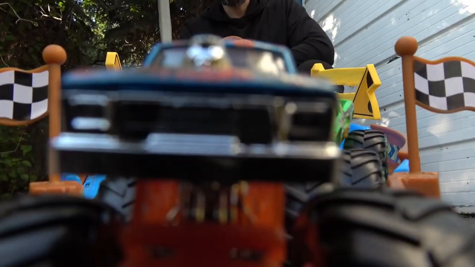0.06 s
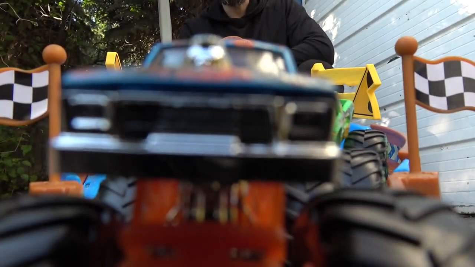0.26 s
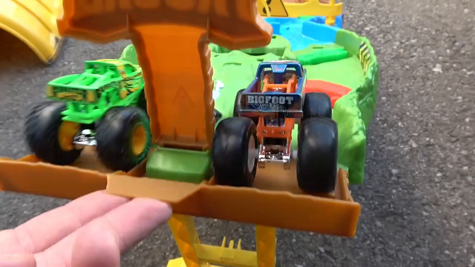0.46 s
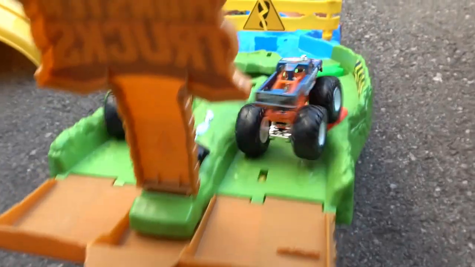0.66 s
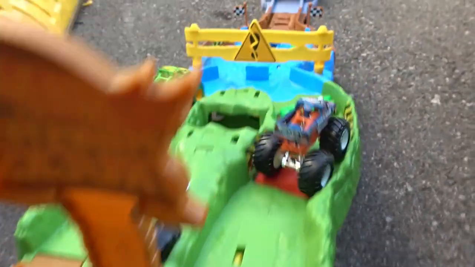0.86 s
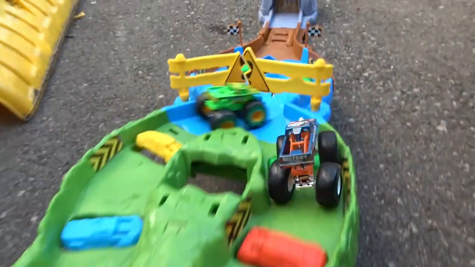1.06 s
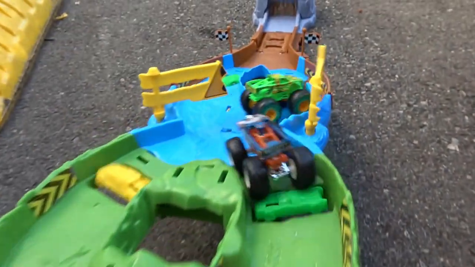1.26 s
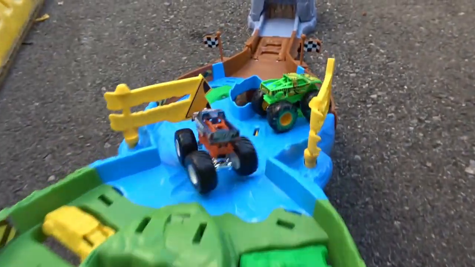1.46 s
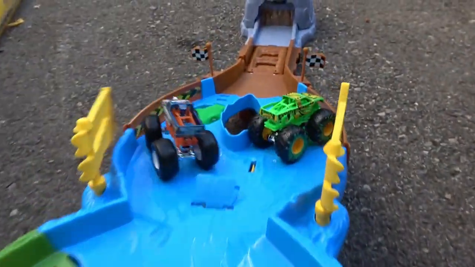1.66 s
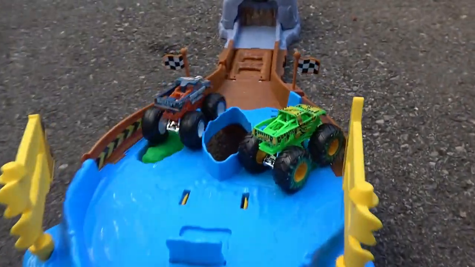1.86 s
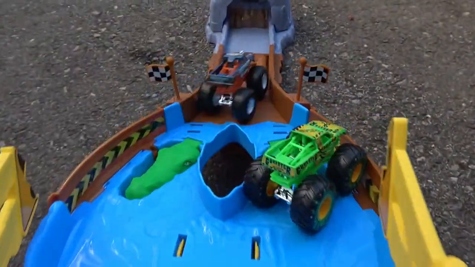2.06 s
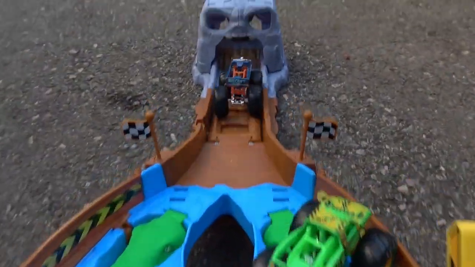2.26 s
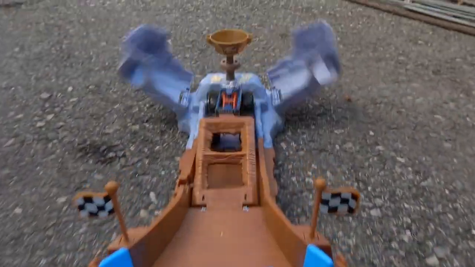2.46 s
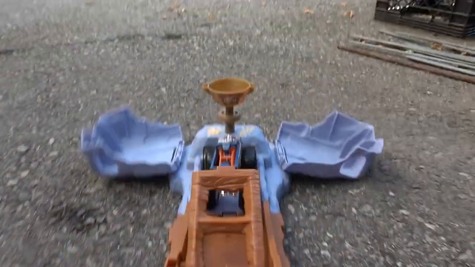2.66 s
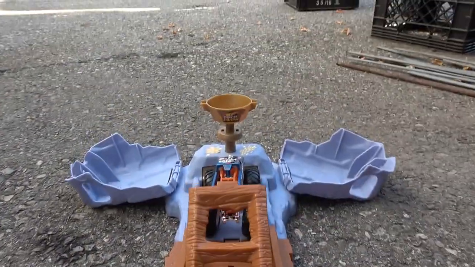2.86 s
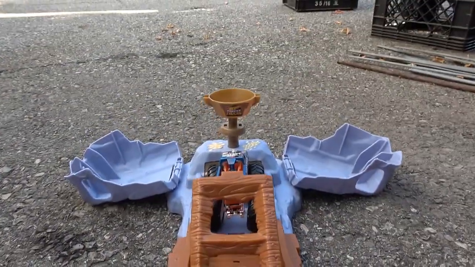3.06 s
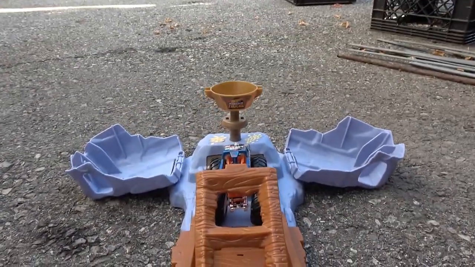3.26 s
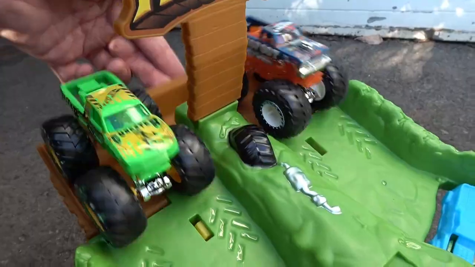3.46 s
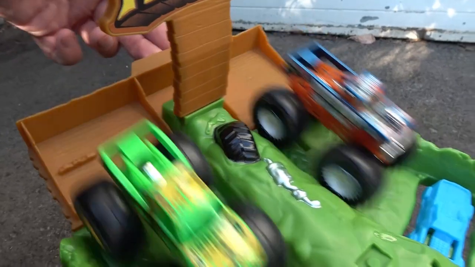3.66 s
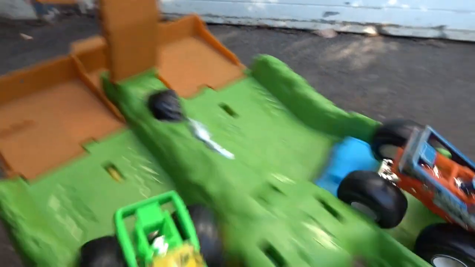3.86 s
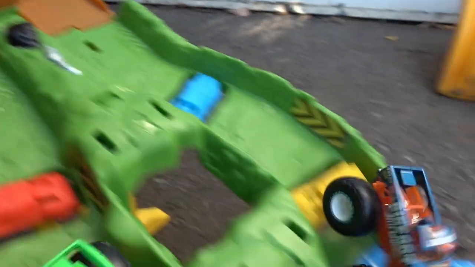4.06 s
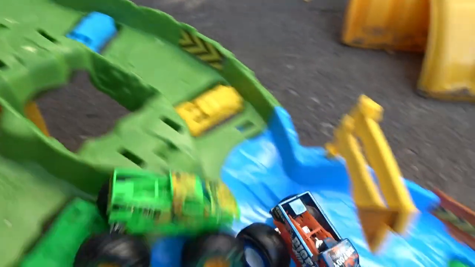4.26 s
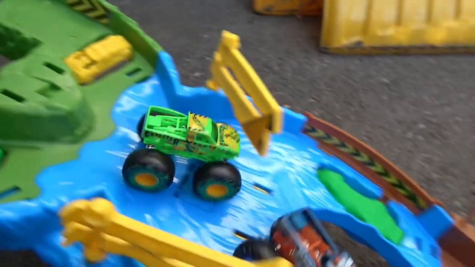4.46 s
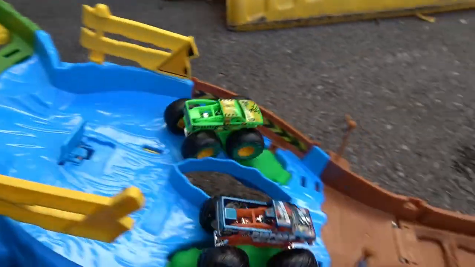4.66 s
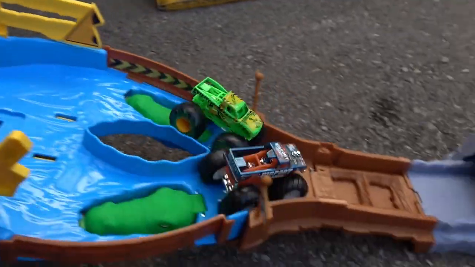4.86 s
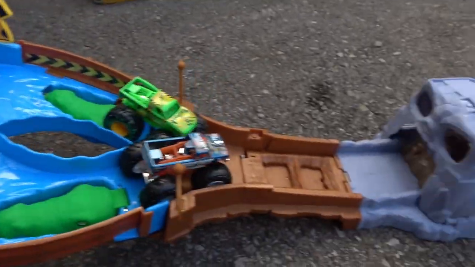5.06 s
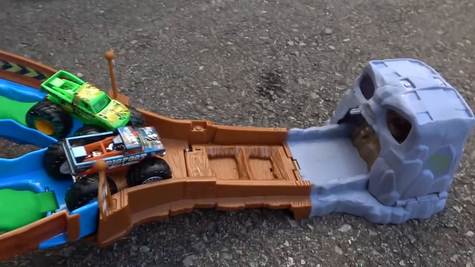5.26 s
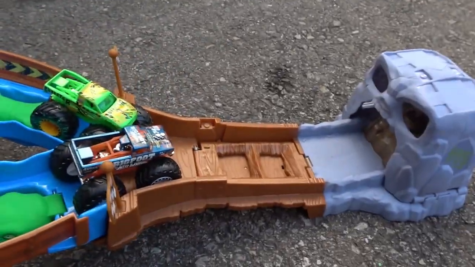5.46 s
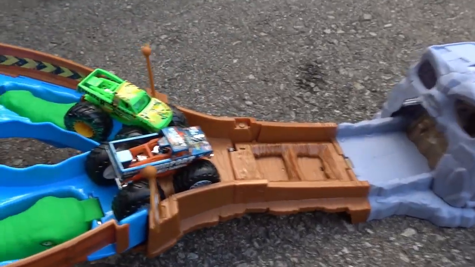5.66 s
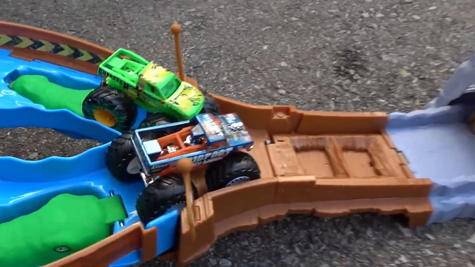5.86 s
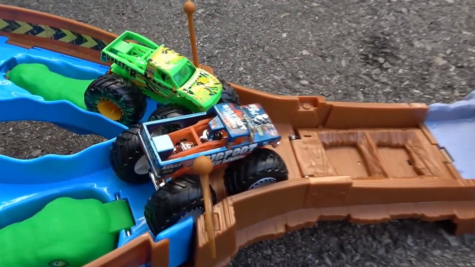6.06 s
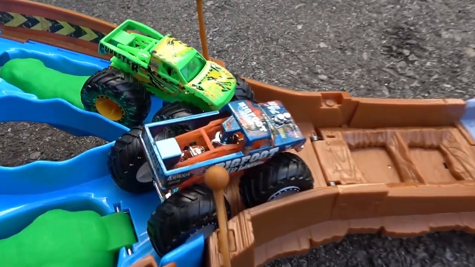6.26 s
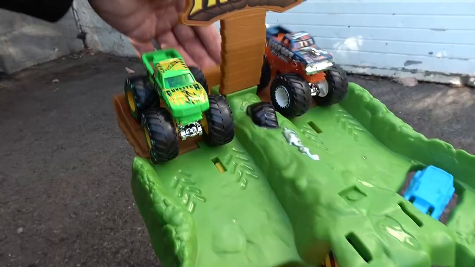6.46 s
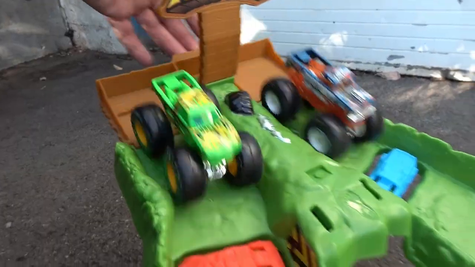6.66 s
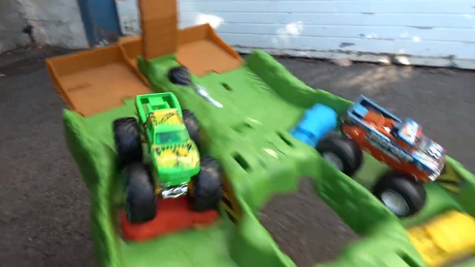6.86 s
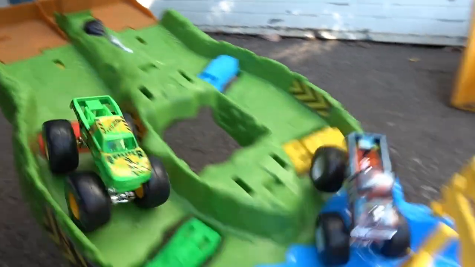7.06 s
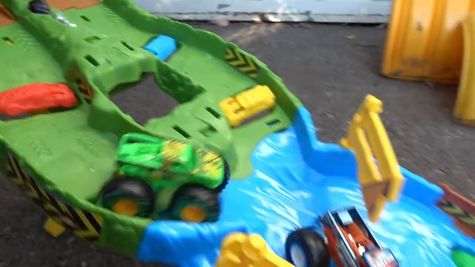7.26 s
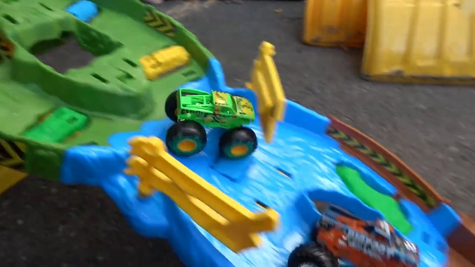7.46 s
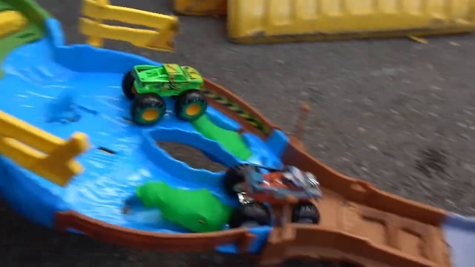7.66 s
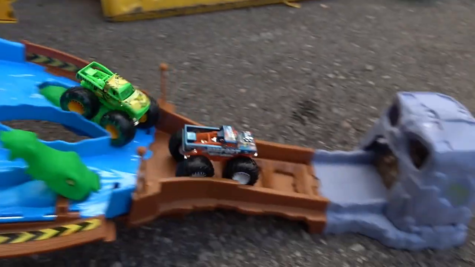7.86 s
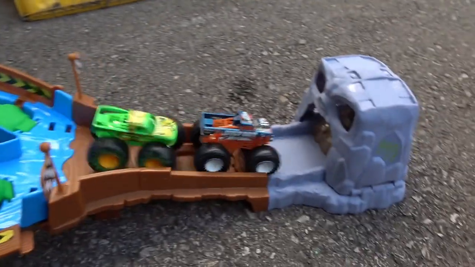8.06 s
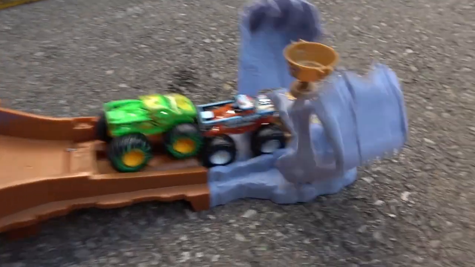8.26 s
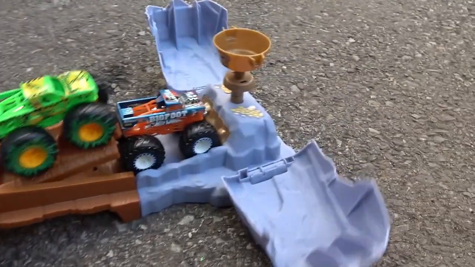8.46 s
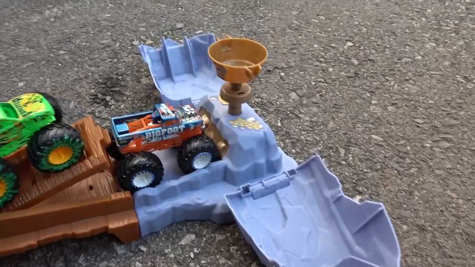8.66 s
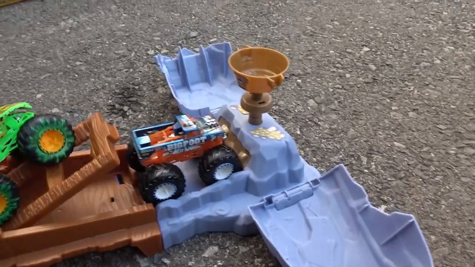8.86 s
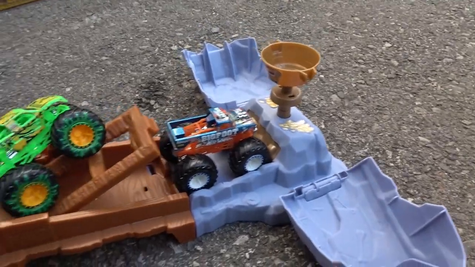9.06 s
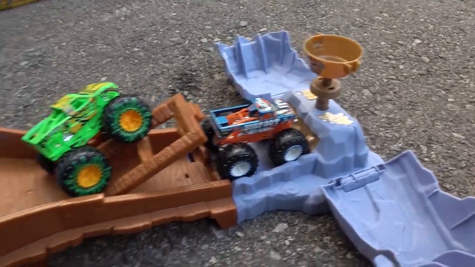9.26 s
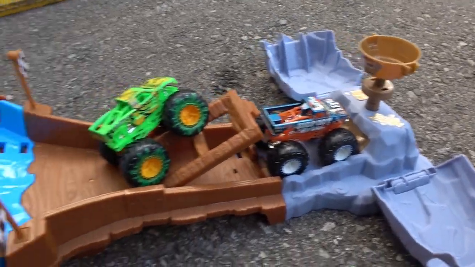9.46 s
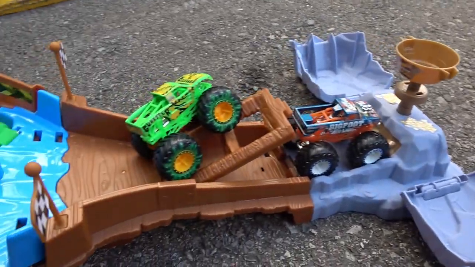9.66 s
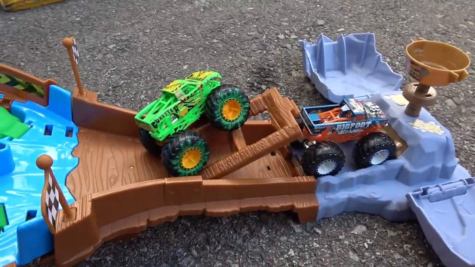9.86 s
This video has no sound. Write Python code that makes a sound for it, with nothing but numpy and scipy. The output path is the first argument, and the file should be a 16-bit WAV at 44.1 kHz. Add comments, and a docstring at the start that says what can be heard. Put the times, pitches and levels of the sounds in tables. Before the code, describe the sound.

Three short bursts of hollow plastic rattling and metallic chatter as toy trucks race down a track, separated by quiet with faint distant traffic rumble.

```python
"""Toy truck races on a hollow track

Two die-cast trucks race three times down a plastic track on pavement: a catch snaps, then they roll over
ramp, bowl and chute, where flaps clack. A wall answers, a faint hiss fades out at first and a town rumbles.
Solid parts are modal: blows and wheel contacts excite banks of decaying sines, dense for thin shells and
sparse for panels and hollows. Town, opening hiss and rubbing fingers are coloured noise."""
import sys
import numpy as np
from scipy import signal
from scipy.fft import rfft, irfft, next_fast_len
from scipy.io import wavfile
from scipy.ndimage import uniform_filter1d, minimum_filter1d, map_coordinates

SR = 44100
rng = np.random.default_rng(int(sys.argv[2]) if len(sys.argv) > 2 else 0)


def store_wav(level_fs):
    """Save 16-bit WAV to argv[1]."""
    pcm = np.round(np.clip(np.atleast_2d(level_fs), -1, 1) * 32767)
    wavfile.write(sys.argv[1], SR, pcm.T.astype(np.int16))


N = 437472  # samples in the scene
RING_S = np.arange(SR // 8, dtype=np.float32) / SR  # time axis of one ringing sound

# Levels in the tables are settings before the fixed trims in the functions that use them.
# The hard hits on bumps and walls. Each row: time in seconds, shell level in dB, click level in dB,
# weight in dB (how far low bands are favoured over high ones).
KNOCKS = [(0.003, -16, -24, 1.5), (0.466, -39.5, -40, 7.5), (0.489, -20, -38.5, 0.5),
          (0.525, -15.5, -29, -0.5), (0.551, -14.5, -26, 2), (0.573, -12.5, -18.5, 10),
          (0.621, -10, -24, 5), (0.702, -10, -13.5, -11.5), (0.747, -16.5, -22.5, -2),
          (0.786, -13.5, -21.5, -1), (0.824, -9, -22.5, -2.5), (0.864, -12, -20.5, 0), (0.941, -6, -8, -4),
          (1.06, -21, -16, -2), (1.151, -10, -16, 0), (1.181, -12.5, -18, -5), (1.263, -13, -10.5, 2.5),
          (1.311, -20.5, -17.5, 2), (1.391, -18.5, -9.5, -1.5), (1.417, -17.5, -20.5, 3),
          (1.444, -6.5, -12, 1.5), (1.461, -22.5, -9, 1.5), (1.518, -29.5, -21, -0.5),
          (1.548, -14.5, -8, 2.5), (1.629, -20, -16, 12.5), (1.754, -10.5, -20.5, 0.5),
          (1.79, -27.5, -11.5, -16), (1.823, -20, -16.5, 2), (1.904, -14, -23.5, 0.5),
          (1.94, -18.5, -10.5, 5), (1.968, -12, -17.5, 4), (2.022, -12, -14.5, 4), (2.063, -18, -22, 10),
          (2.121, -10.5, -14, 5.5), (2.177, -11.5, -24.5, 1.5), (2.226, -10.5, -22.5, 1.5),
          (2.344, -7.5, -24, 1.5), (2.25, -14, -18, 7.5), (2.278, -15.5, -14, -6),
          (2.309, -13.5, -10, -8.5), (2.359, -18, -25.5, 0), (2.429, -4.5, -11.5, -8),
          (2.463, -10.5, -14.5, -2), (2.519, -9.5, -12.5, -2.5), (2.596, -17.5, -9.5, -9),
          (2.604, -8, -20.5, 2), (3.571, -21, -46, 20), (3.649, -15.5, -35, 14.5),
          (3.664, -8.5, -17.5, 13.5), (3.708, -9.5, -29.5, 9.5), (3.736, -11, -28.5, 9),
          (3.762, -6.5, -25.5, 2.5), (3.786, -6.5, -9.5, -2.5), (3.808, -12, -12.5, -1),
          (3.846, -7.5, -15.5, 6), (3.97, -10, -11, 2.5), (4.036, -5.5, -18.5, -4.5),
          (4.086, -14.5, -13, 1), (4.228, -16, -20, 2), (4.187, -10, -19, -4), (4.453, -18.5, -28, 5),
          (4.496, -10.5, -11.5, 0), (4.601, -16.5, -17.5, -2), (4.65, -14.5, -27, 3),
          (4.681, -9.5, -25, 1.5), (4.763, -13.5, -11.5, 1.5), (4.849, -5.5, -12.5, -6),
          (4.892, -10, -17.5, -10.5), (4.94, -7.5, -10.5, 0), (4.965, -16.5, -11, -4.5),
          (5.002, -23.5, -27.5, -4.5), (5.034, -20.5, -34.5, -0.5), (5.072, -27.5, -47, 21.5),
          (6.639, -18, -30, 15), (6.646, -9.5, -29.5, 8), (6.692, -9.5, -11.5, 5.5), (6.754, -11, -19.5, 1),
          (6.776, -9.5, -24, 4.5), (6.861, -10.5, -23, 3), (6.968, -5, -9.5, 5.5),
          (7.034, -15.5, -12.5, -6), (7.054, -20.5, -4.5, 1), (7.114, -2.5, -15, -4), (7.16, -6, -22, 1.5),
          (7.22, -12.5, -11.5, 1), (7.362, -10.5, -20.5, -4), (7.404, -8, -35, -4),
          (7.448, -11, -21.5, -5.5), (7.485, -11, -7.5, 3.5), (7.535, -17, -10, -2.5),
          (7.568, -8.5, -15.5, -4), (7.617, -11, -12.5, 4), (7.669, -9.5, -4.5, 1.5),
          (7.701, -15.5, -13, 6), (7.768, -12.5, -21, -2), (7.85, -15.5, -12.5, -2),
          (7.901, -12, -20, -4.5), (7.918, -24.5, -10, -7), (8.0, -14, -11.5, -5.5),
          (8.032, -13.5, -20.5, -3.5), (8.098, 1.5, 0, -10.5), (8.162, -7.5, -28, -0.5),
          (8.192, -8.5, -15, -13), (8.271, -6.5, -12.5, -8), (8.304, -12, -14, -6.5),
          (8.361, -18, -20, -25), (8.437, -10, -19, -4), (8.449, -16, -13.5, 5)]
# The races. Each row: gate opening, arrival at the bowl, arrival at the chute and stop, all in seconds,
# then chatter offset in dB.
RACES = [(0.502, 1.24, 2.08, 2.62, -1.5), (3.612, 4.216, 4.95, 5.0, 0.5), (6.598, 7.238, 7.93, 8.46, 1)]
# Colour of a metal truck body. Each row: frequency in Hz, density in dB per Hz.
TRUCK = [(1590, -5.5), (2700, -3), (5610, -7), (11900, -20), (14300, -28), (15200, -42.5), (15500, -41)]
# Overtones of any boom or thump. Each row: pitch ratio, level in dB.
HOLLOW_MODES = [(0.999, 0.5), (1.19, -6.5), (1.8, -11.5)]

START_DELAY_S = 0.035  # from the gate's opening to the first rolling
STOP_DB_PER_S = 315.5  # how fast any rolling dies away


def amp(db):
    """Level law: decibels to linear gain."""
    return 10 ** (np.asarray(db) / 20)


def unit(x):
    """Normalisation: scales a signal to rms 1."""
    return x / np.sqrt(np.mean(x ** 2) + 1e-20)


def along(points, hz):
    """Spectral envelope: (Hz, value) points interpolated on a logarithmic frequency axis."""
    f, v = np.transpose(points)
    return np.interp(np.log(hz + 1), np.log(f + 1), v)


def at(rows, times):
    """Time envelope: each column of a curve, interpolated linearly at the given times."""
    s, *cols = np.transpose(rows)
    return [np.interp(times, s, c) for c in cols]


def filtered(x, response):
    """Linear filtering: the spectrum of x times a response of frequency."""
    m = next_fast_len(N + SR // 2)
    spectrum = rfft(x, m) * response(np.fft.rfftfreq(m, 1 / SR))
    return irfft(spectrum, m)[..., :N]


def wobble(rate):
    """Slow random modulation: a spline through random knots, rate of them a second."""
    knots = rng.standard_normal(int(N * rate / SR) + 4)
    return map_coordinates(knots, [np.arange(N) * rate / SR])


def add(track, times, sounds, pan_db):
    """Superposition: lays each sound into a stereo track, pan_db being left over right."""
    for s, sound, pan in zip(times, sounds, pan_db):
        start = max(round(s * SR), 0)
        part = sound[:N - start]
        track[:, start:start + len(part)] += amp([[pan / 2], [-pan / 2]]) * part


def air(spectrum, side_db):
    """Partial coherence: stereo noise of rms 1, a shared mid plus an opposed side."""
    mid, side = filtered(rng.standard_normal((2, N)), lambda hz: amp(along(spectrum, hz)))
    return unit(np.array([mid + amp(side_db) * side, mid - amp(side_db) * side]))


def modes(spectrum, t60, damping, count):
    """Modal density: the Hz and decaying sines of a thin part; t60 in seconds holds at 1 kHz."""
    edges = np.geomspace(max(spectrum[0][0], 20), spectrum[-1][0], count + 1)
    hz = edges[:-1] + np.diff(edges) * rng.random(count)
    life = t60 * (np.maximum(hz, 500) / 1000) ** -damping  # with damping, higher modes die sooner
    size = amp(along(spectrum, hz)) * np.sqrt(np.diff(edges) / life)
    size, turn, fade = np.float32([size, 2 * np.pi * hz, np.log(1000) / life])[:, :, None]
    decay = np.exp(-np.minimum(fade * RING_S, 20))
    return hz, size * np.sin(turn * RING_S) * decay


def strike(part, db, weight_db=0):
    """Modal excitation: one sound a blow, at db rms over 10 ms, weighted by spot struck and heaviness."""
    hz, ringing = part
    lowness = np.clip(np.log2(900 / hz) / 2, -.5, .5)
    third = 3 * np.log2(hz / 20)  # position in third-octaves
    bands = np.maximum(0, 1 - np.abs(np.arange(31)[:, None] - third))
    spot_db = 4.5  # every spot favours its own bands
    colour_db = spot_db * rng.standard_normal((len(db), len(bands))) @ bands
    colour_db = colour_db + np.outer(weight_db, lowness)
    sounds = np.float32(rng.standard_normal(colour_db.shape) * amp(colour_db)) @ ringing
    level = np.sqrt(np.mean(sounds[:, :SR // 100] ** 2, axis=1))
    return sounds * np.float32(amp(db) / level)[:, None]


def ring(hz, db, t60, rise_s):
    """Sparse resonance: a few clear modes, varied from blow to blow; rms 1 over the first 10 ms."""
    hz, db, t60 = np.reshape([hz, db, t60], (3, -1, 1))
    varied_db = db + 1.5 * rng.standard_normal(hz.shape)
    size = amp(varied_db) * rng.choice([-1, 1], hz.shape)
    partials = size * amp(-60 * RING_S / t60) * np.sin(2 * np.pi * hz * RING_S)
    sound = np.sum(partials, axis=0) * (1 - np.exp(-RING_S / rise_s))
    return sound / np.sqrt(np.mean(sound[:SR // 100] ** 2))


def town():
    """Distant sources: only a swelling low rumble and murmur of traffic remain, under a thin hiss."""
    # Town levels through the scene, in four stretches of time. Each row: time in seconds,
    # rumble level in dB, murmur level in dB, hiss level in dB.
    swells = [
        [(0.15, -39.5, -43, -70.5), (0.288, -42, -44.5, -69.5), (0.44, -38, -41.5, -68.5)],
        [(2.98, -44, -41.5, -64.5), (3.11, -42.5, -41, -69.5), (3.24, -38, -38, -67.5)],
        [(5.22, -41.5, -45, -68.5), (5.34, -41.5, -45.5, -67), (6.42, -34, -39.5, -62.5), (7.3, -42, -39, -66)],
        [(8.6, -43, -38, -66), (9.15, -40, -44.5, -64.5), (9.518, -40, -43, -66.5), (9.9, -35.5, -39, -62.5)],
    ]
    # Colours of rumble, murmur and hiss. Each row: frequency in Hz, density in dB per Hz.
    rumble_colour = [(13, -39), (22, -12.5), (38, -4), (64, -9.5), (91, 1), (113, -0.5), (168, 0),
                     (226, -9), (252, -7.5), (300, -10), (390, -41.5), (660, -120)]
    murmur_colour = [(140, -25.5), (240, -4.5), (315, -5), (375, -7), (560, -8.5), (826, -14.5),
                     (1080, -16.5), (1280, -22), (1700, -29), (2200, -44.5), (4000, -64), (5200, -84.5),
                     (8800, -120)]
    hiss_colour = [(2000, 4), (3500, -3.5), (7000, -4), (10000, -7.5), (12500, -4), (15000, -11.5)]
    rumble_db, murmur_db, hiss_db = at(np.vstack(swells), np.arange(N) / SR)
    rumble = amp(rumble_db + 1.86 + 1.3 * wobble(1.5)) * air(rumble_colour, side_db=-15.5)
    rumble = rumble * amp([[1.3], [-1.3]])  # leans to the left
    murmur = amp(murmur_db + .6 * wobble(1.8)) * air(murmur_colour, side_db=-15.0)
    return rumble + murmur + amp(hiss_db + 3.0) * air(hiss_colour, side_db=-7.5)


def opening_hiss():
    """Fading hiss: faint broadband noise at the opening, shaped by a spectral and a time envelope."""
    # Level of the hiss. Each row: time in seconds, level in dB.
    fade = [(0, -53.5), (0.45, -54), (0.7, -90)]
    # Colour of the hiss. Each row: frequency in Hz, density in dB per Hz.
    hiss_colour = [(500, -20.5), (1300, 1), (2500, -6.5), (5000, -14), (7500, -22), (10000, -42)]
    return amp(at(fade, np.arange(N) / SR)[0]) * air(hiss_colour, side_db=-12.5)


def place(times):
    """Kinematics: the piece reached, 0 ramp, 1 bowl, 2 chute; between races the trucks are carried back."""
    carry_s = .3  # margin at both ends of a race
    crossing_s = 0.14  # half the time for which the trucks are spread over two pieces
    route = []
    for gate_s, bowl_s, chute_s, stop_s, *_ in RACES:
        route += [(gate_s - carry_s, 0), (bowl_s - crossing_s, 0), (bowl_s + crossing_s, 1),
                  (chute_s - crossing_s, 1), (chute_s + crossing_s, 2), (stop_s + carry_s, 2)]
    return at(route, times)[0]


def surface(times):
    """Contact excitation: shell and chatter dB of the piece under the wheels."""
    # Rolling on ramp, bowl and chute in turn. Each row: plastic shell level in dB, truck chatter level in dB.
    surfaces = [(-12, -17), (-14.5, -17.5), (-14, -20.5)]
    return [np.interp(place(times), np.arange(len(surfaces)), column) for column in np.transpose(surfaces)]


def airborne(times, lift_db, flight):
    """Loss of contact: rolling thins (dB) just before a hard landing, flight in seconds setting how long."""
    landings = np.append(np.sort(np.transpose(KNOCKS)[0]), np.inf)
    wait = landings[np.searchsorted(landings, times)] - times
    return lift_db * np.exp(-(wait / flight) ** 2)


def shaken(times):
    """Transient agitation: how much (dB) the latest hard hit still stirs up wheels and axles."""
    shake_db, settle_s = 0.5, 0.023
    hits = np.append(-np.inf, np.sort(np.transpose(KNOCKS)[0]))
    since = times - hits[np.searchsorted(hits, times) - 1]
    return shake_db * np.exp(-since / settle_s)


def race_levels(race, times):
    """Rolling noise: shell and chatter dB follow surface, hits and jumps; chatter also builds with speed."""
    # The trucks leave the track. Each row: take-off in seconds, landing in seconds, dip of the shell in dB.
    jumps = [(0.925, 0.933, -8), (1.484, 1.516, -5.5), (1.644, 1.753, -5.5), (1.95, 1.964, -11),
             (1.965, 2.009, -5.5), (2.556, 2.595, -4.5), (3.922, 3.964, -4.5), (4.657, 4.682, -5.5),
             (4.813, 4.842, -3.5), (7.08, 7.108, -6.5), (7.543, 7.563, -7), (8.394, 8.434, -7.5)]
    gather_s, slow_db = 0.16, -9  # chatter starts this far down and recovers as speed gathers
    chatter_dip = 2.4  # the dip in dB is this many times as deep for unloaded axles
    gate_s, _, _, _, chatter_db = race
    shell, chatter = surface(times)
    slow = np.exp(-np.maximum(times - gate_s - START_DELAY_S, 0) / gather_s)
    dip = sum(db * ((times > off) & (times < landing)) for off, landing, db in jumps)
    stir = shaken(times)
    return shell + stir + dip, chatter + chatter_db + slow_db * slow + stir + chatter_dip * dip


def movements():
    """Source schedule: start s and end s of each stretch of rolling, with a function giving its levels."""
    # Slow shuffles: a truck set in place, the platform jiggled and tipped, a truck rocking to rest.
    # Each row: start in seconds, end in seconds, shell level in dB, chatter level in dB.
    shuffles = [(0, 0.005, -22.5, -31.5), (0.469, 0.527, -22.5, -36.5), (2.719, 2.836, -30.5, -42.5),
                (3.59, 3.637, -20.5, -41.5), (6.581, 6.643, -22, -51), (8.728, 8.926, -32, -43.5)]
    races = [(race[0] + START_DELAY_S, race[3], lambda times, race=race: race_levels(race, times))
             for race in RACES]
    return races + [(start, end, lambda times, db=db: db) for start, end, *db in shuffles]


def contacts(start, end, rate, scatter_db, spread_db):
    """Random impacts: times, dB about the rolling level and left-right dB, dying away after the end."""
    run_out_s = .11
    draw = rng.random((int((end + run_out_s - start) * rate), 3))
    times = start + (np.arange(len(draw)) + draw[:, 0]) / rate
    size_db = -scatter_db * np.log(np.maximum(draw[:, 1], .04))
    size_db = size_db - 10 * np.log10(np.mean(amp(size_db) ** 2))  # mean power held at 0 dB
    size_db = size_db - STOP_DB_PER_S * np.maximum(times - end, 0)
    size_db = size_db + airborne(times, lift_db=-2.0, flight=0.017)
    return times, size_db, spread_db * (2 * draw[:, 2] - 1)


def shell_blows(pieces, times, db, weight_db, pan_db):
    """Shell radiation: blows excite whichever piece of track the trucks have reached."""
    out = np.zeros((2, N))
    # while the trucks straddle two pieces, chance picks the one struck
    piece = np.clip(np.floor(place(times) + rng.random(len(times))), 0, len(pieces) - 1)
    for k, part in enumerate(pieces):
        here = piece == k
        add(out, times[here], strike(part, db[here], weight_db[here]), pan_db[here])
    return out


def resonances(hollows, times, db, pan_db):
    """Coupled resonance: underside, floor and deck answer each blow, by shares that vary along the way."""
    # How strongly the wheels wake the three, one table a race. Each row: time in seconds, then the shares
    # of underside, floor and deck in dB.
    shares = [
        [(0.55, -8, -36, -6), (0.8, -15.5, -27.5, -2.5), (1.08, -10.5, -25.5, -2.5), (1.35, -13, -2.5, -8.5),
         (1.65, -10.5, -4.5, -13), (1.95, -21.5, -3, -13), (2.2, -24, -9, -4.5), (2.6, -28.5, -4, -16)],
        [(3.65, -10.5, -8.5, 0), (4.1, -11.5, -10, -2), (4.32, -5, 0.5, -19), (4.45, -8.5, -1, -5),
         (4.72, -15.5, 1, -6), (4.86, -16.5, -8, -10.5), (5.05, -15.5, -4, -5.5)],
        [(6.64, -12.5, -6.5, 3), (6.9, -14.5, -6, -15.5), (7.15, -13, -7, -9), (7.3, -6.5, -1.5, -12.5),
         (7.55, -13.5, -5, -6.5), (7.9, -29.5, -27, -9.5), (8.05, -20, -16, -14), (8.2, -19.5, -5, -15.5),
         (8.45, -32.5, -2, -9.5)],
    ]
    out = np.zeros((2, N))
    for part, share_db in zip(hollows, at(np.vstack(shares), times)):
        add(out, times, strike(part, db + share_db), pan_db)
    return out


def rolling(pieces, hollows, trucks):
    """Rolling excitation: knobbly tyres drum on the hollow shell while loose axles chatter in two bodies."""
    out = np.zeros((2, N))
    for start, end, levels in movements():
        times, size_db, pan_db = contacts(start, end, rate=150, scatter_db=2.5, spread_db=1.5)
        shell_db = levels(times)[0] + size_db
        out += shell_blows(pieces, times, shell_db - 4.5, np.zeros(len(times)), pan_db)
        out += resonances(hollows, times, shell_db - 9.0, pan_db)
        for truck in trucks:
            times, size_db, pan_db = contacts(start, end, rate=115, scatter_db=0, spread_db=2)
            chatter_db = levels(times)[1] + size_db
            add(out, times, strike(truck, chatter_db - 5.0), pan_db)
    return out


def jostles():
    """Random collisions: lesser bumps through each race, as rows like those of the hard hits."""
    per_s, spread_db = 7, 3.5
    shell_over_db, click_over_db = 1.5, 1.5  # relative to the rolling levels
    weight_spread_db = 5
    rows = []
    for race in RACES:
        times, size_db, _ = contacts(race[0] + START_DELAY_S, race[3], per_s, spread_db, spread_db=0)
        shell_db, chatter_db = race_levels(race, times)
        weight_db = weight_spread_db * rng.standard_normal(len(times))
        rows += zip(times, shell_db + size_db + shell_over_db, chatter_db + size_db + click_over_db, weight_db)
    return rows


def crack(click_db):
    """Contact transient: the blow itself, a millisecond or two long."""
    return strike(modes(TRUCK, t60=0.0015, damping=0, count=90), click_db - 16.0)


def knocks(pieces, hollows, trucks):
    """Impact excitation: a hit booms in the plastic, once for each axle, and rings in one of the trucks."""
    rebound_s, rebound_db = 0.012, -8.5  # mean delay and level offset of the second axle's blow
    aside_db, spread_db = -0.6, 1.6
    times, shell_db, click_db, weight_db = np.transpose([*KNOCKS, *jostles()])
    pan_db = aside_db + spread_db * rng.standard_normal(len(times))
    out = shell_blows(pieces, times, shell_db - 0.7, weight_db, pan_db)
    second = times + rebound_s * (.5 + rng.random(len(times)))
    out += shell_blows(pieces, second, shell_db + rebound_db, weight_db, pan_db)
    out += resonances(hollows, times, shell_db - 5.5, pan_db)
    which = rng.integers(len(trucks), size=len(times))
    for k, truck in enumerate(trucks):
        own = which == k
        add(out, times[own], strike(truck, click_db[own] - 0.8), pan_db[own])
    add(out, times, crack(click_db), pan_db)
    return out


def gate():
    """Released strain: the stiff little catch snaps short and dry and rings, and the platform shivers."""
    # Colour of the catch. Each row: frequency in Hz, density in dB per Hz.
    catch_colour = [(300, -13), (600, -7), (1000, 0), (1400, -4), (2000, 2), (2550, -8), (3050, -6),
                    (3600, -17.5), (4650, -9.5), (5400, -14.5), (7200, -11.5), (10000, -25), (15000, -37)]
    # What the catch rings with. Each row: frequency in Hz, level in dB, t60 in seconds.
    catch_modes = [(937, -3, 0.025), (1650, -5, 0.02), (2051, 0, 0.03), (2260, -2, 0.025),
                   (2980, -3, 0.025), (3736, -12, 0.03), (4721, -8, 0.028), (7200, -3, 0.012)]
    snap_db, ring_db, shiver_db = -9.5, -13, -21
    out = np.zeros((2, N))
    times = np.transpose(RACES)[0]
    each, ahead = np.ones(len(times)), np.zeros(len(times))
    snap = modes(catch_colour, t60=.012, damping=0, count=160)
    shiver = modes(catch_colour, t60=.06, damping=.3, count=160)
    rings = np.array([ring(*np.transpose(catch_modes), rise_s=0.0004) for _ in times])
    sounds = strike(snap, snap_db * each) + amp(ring_db) * rings + strike(shiver, shiver_db * each)
    add(out, times, sounds, ahead)
    return out


def pings():
    """Paired modes: a clipped wall lets one part ring above the clatter with two close pitches."""
    # Glancing blows. Each row: time in seconds, frequency in Hz, level in dB.
    glances = [(0.707, 2466, -17), (0.748, 2420, -15.5), (0.959, 1010, -9), (1.021, 860, -9.5),
               (1.124, 2430, -19.5), (1.916, 532, -12.5), (3.786, 3550, -11), (4.398, 5860, -19),
               (6.754, 3830, -18), (7.034, 2705, -11.5), (7.2, 3555, -16.5), (8.389, 1062, -19.5)]
    t60, pair_ratio, pair_db = 0.06, 1.06, -4  # decay in seconds; the neighbouring mode's pitch and level
    out = np.zeros((2, N))
    for s, hz, db in glances:
        sound = ring([hz, hz * pair_ratio], [0, pair_db], [t60] * 2, rise_s=0.00036)
        add(out, [s], [amp(db) * sound], [0])
    return out


def booms(rows, t60, rise_s):
    """Slow contact: soft heavy blows wake only the lowest modes of a hollow part."""
    out = np.zeros((2, N))
    ratio, mode_db = np.transpose(HOLLOW_MODES)
    for s, hz, db in rows:
        add(out, [s], [amp(db) * ring(hz * ratio, mode_db, t60 / ratio, rise_s)], [0])
    return out


def clacks(chute, truck):
    """Panel impact: a panel rings and the hollow under it booms, chute and truck rattle; soft is duller."""
    # Single clacks after the rolling, as flaps spring open and bounce, trucks settle or a finger taps.
    # Each row: time in seconds, panel frequency in Hz, panel level in dB, hollow frequency in Hz,
    # hollow level in dB, metal click level in dB.
    blows = [(2.697, 1720, -30, 536, -35, -27.5), (2.715, 1148, -11.5, 504, -29.5, -23),
             (2.755, 1570, -18, 520, -32.5, -40), (2.766, 1083, -11, 542, -12.5, -19.5),
             (2.837, 1035, -17, 512, -23.5, -29), (2.873, 1060, -36, 550, -24, -53.5),
             (3.467, 820, -36.5, 793, -31, -47.5), (5.131, 1055, -30.5, 560, -36, -47.5),
             (8.572, 1082, -11, 614.7, -19, -17), (8.623, 1032, -16, 617, -25, -30),
             (8.638, 1070, -7, 558, -17.5, -15.5), (8.648, 987, -14.5, 680, -17, -28),
             (8.704, 1036, -20, 684, -19, -36.5), (8.77, 1100, -28.5, 640, -36, -41),
             (8.816, 1096, -19.5, 685, -34, -26.5), (8.844, 1160, -20.5, 800, -25, -37),
             (8.885, 1040, -16, 830, -31, -34.5), (9.01, 1180, -34.5, 710, -46, -49.5),
             (9.053, 1167, -28.5, 686, -42, -50)]
    # Strong modes of a stiff plastic panel, shifted to each blow's pitch. Each row: frequency in Hz,
    # level in dB, t60 in seconds.
    panel_modes = [(1080, 0, 0.032), (1220, -6, 0.035), (1540, -2, 0.04), (1680, -3, 0.04),
                   (2200, -8, 0.03), (2650, -8, 0.035), (3100, -9, 0.035), (3980, -13, 0.04),
                   (4850, -16, 0.05)]
    hollow_t60, hollow_rise_s = 0.045, 0.005
    dulling = 0.15  # dB per octave of treble lost for each dB that a clack is softer
    out = np.zeros((2, N))
    mode_hz, mode_db, mode_t60 = np.transpose(panel_modes)
    ratio, ratio_db = np.transpose(HOLLOW_MODES)
    times, _, panel_db, _, _, click_db = np.transpose(blows)
    for s, panel_hz, db, hollow_hz, hollow_db, _ in blows:
        spot_db = 2.5 * rng.standard_normal(len(panel_modes))
        soft_db = dulling * (db - panel_db.max()) * np.log2(mode_hz / mode_hz[0])
        pitched_hz = mode_hz * panel_hz / mode_hz[0]
        panel = ring(pitched_hz, mode_db + spot_db + soft_db, mode_t60, rise_s=0.00033)
        hollow = ring(hollow_hz * ratio, ratio_db, hollow_t60 / ratio, hollow_rise_s)
        add(out, [s], [amp(db - 4.0) * panel + amp(hollow_db) * hollow], [0])
    ahead = np.zeros(len(times))
    add(out, times, strike(truck, click_db - 0.5) + crack(click_db), ahead)
    for delay_s, loss_db in [(0, -5), (.007, -7.5), (.018, -15)]:  # the chute's rattle
        later = times + delay_s * (.5 + rng.random(len(times)))
        add(out, later, strike(chute, panel_db + loss_db), ahead)
    return out


def ticks():
    """Band-limited transients: small gritty ticks, each a dying puff of noise in its own broad band."""
    # Faint ticks between the races. Each row: time in seconds, onset level in dB, centre frequency in Hz,
    # t60 in seconds.
    puffs = [(3.261, -44, 2135, 0.12), (3.397, -49, 4980, 0.05), (5.448, -54, 6410, 0.033),
             (5.496, -58, 3040, 0.079), (5.666, -37.5, 2400, 0.11), (5.889, -37, 5900, 0.05)]
    out = np.zeros((2, N))
    hz = np.fft.rfftfreq(len(RING_S), 1 / SR)
    for s, db, centre, t60 in puffs:
        colour = [(centre / 4, -28), (centre * 0.69, -3), (centre, 0), (centre * 1.6, -5), (centre * 4, -24)]
        noise = rfft(rng.standard_normal(len(RING_S)))
        grit = unit(irfft(noise * amp(along(colour, hz)), len(RING_S)))
        add(out, [s], [grit * amp(db - 60 * RING_S / t60)], [0])
    return out


def fingers():
    """Sliding friction: skin rubs unevenly over plastic, and the start tower sways under the hand."""
    # Rubs along the start platform before a launch. Each row: start in seconds, end in seconds,
    # rub level in dB, sway level in dB.
    rubs = [(3.349, 3.571, -43, -33), (6.51, 6.591, -38.5, -30)]
    # Colours of skin on plastic and of the swaying tower. Each row: frequency in Hz, density in dB per Hz.
    skin = [(300, 7), (900, 12.5), (2500, -10), (7000, -13), (15000, -20)]
    tower = [(20, -11), (35, -7), (60, -8), (95, -1.5), (135, 0.5), (200, -4.5), (400, -9.5), (800, -71)]
    fade_db_per_s = 1099.5  # before and after each rub
    t = np.arange(N) / SR
    rub, sway = np.zeros((2, N))
    for start, end, rub_db, sway_db in rubs:
        touch = amp(-fade_db_per_s * np.abs(t - np.clip(t, start, end)))
        rub = rub + amp(rub_db) * touch
        sway = sway + amp(sway_db) * touch
    sliding = rub * amp(2.3 * wobble(60)) * air(skin, side_db=-10.5)
    return sliding + sway * amp(1.5 * wobble(30)) * air(tower, side_db=-15.0)


def surroundings(x, near_db, near_t60, tail_db):
    """Scattering and reverberation: ground and track scatter treble to each ear; a wall adds a faint tail."""
    # Decay of the wall's tail. Each row: frequency in Hz, t60 in seconds.
    wall = [(200, 0.44), (600, 0.23), (1500, 0.19), (4000, .3), (12000, 0.063)]
    near_colour = [(1500, -34.5), (3000, -24), (5500, 2.0), (9000, 9.5), (12000, -6.5)]  # (Hz, dB)
    hop, length = SR // 3, SR // 4
    x, out = np.pad(x, ((0, 0), (hop, 2 * hop))), np.zeros((2, N + 4 * hop))
    # a fresh response every third of a second, crossfaded, as the listening point moves
    for start in range(0, N + hop, hop):
        hz, t, z = signal.stft(rng.standard_normal((2, 2, length)), SR, nperseg=256)
        near = z[0] * amp(along(near_colour, hz)[:, None] - 60 * t / near_t60)
        tail = z[1] * amp(-60 * t / along(wall, hz)[:, None])
        near, tail = signal.istft(np.array([near, tail]), SR, nperseg=256)[1]
        tail = tail + .5 * tail[::-1]  # the wall lies ahead, so both ears hear much the same
        near = amp(near_db) * near / np.linalg.norm(near[0])
        answer = near + amp(tail_db) * tail / np.linalg.norm(tail[0])
        windowed = x[:, start:start + 2 * hop] * signal.windows.cosine(2 * hop)
        heard = signal.fftconvolve(windowed, answer, axes=1)
        out[:, start:start + heard.shape[1]] += heard
    return out[:, hop:hop + N]


def scene():
    """Superposition of sources: track, trucks, gate and hand in the open air."""
    # Colours of the hollow track pieces. Each row: frequency in Hz, density in dB per Hz.
    ramp = [(65, -43.5), (110, -9), (206, -22.5), (292, -12), (329, -17.5), (434, 2), (487, -12), (548, 2),
            (653, -4.5), (778, 1.5), (913, -6.5), (982, 1), (1390, -4.5), (2390, -7.5), (3600, -16.5),
            (4680, -21.5), (7920, -120)]
    bowl = [(76, -56), (130, -27), (156, -26.5), (203, -22.5), (250, -14.5), (467, -2.5), (559, -2),
            (803, -5), (989, -1), (1380, -6.5), (1540, -1), (1930, -10), (2210, -2.5), (3600, -22.5),
            (4680, -21.5), (7920, -120)]
    chute = [(140, -57.5), (230, -34.5), (252, -28), (280, -28.5), (369, -19.5), (428, -3), (558, -3.5),
             (686, -0.5), (753, -7.5), (1080, 3), (1280, -3), (1700, -4), (2000, -11), (2930, -12),
             (3600, -25.5), (4680, -31), (7920, -120)]
    # Low drumming of the hollow underside, hum of the broad floor, brighter ring of the narrow lanes.
    # Each row: frequency in Hz, density in dB per Hz.
    underside = [(140, -23.5), (200, -5), (290, -1), (360, 0), (440, -4.5)]
    floor = [(400, -17.5), (450, -10.5), (510, -2.5), (575, 1.5), (645, -3.5), (750, -13.5)]
    deck = [(700, -13), (820, -4.5), (890, -3.5), (980, -4), (1130, -19.5)]
    # A truck drops with its whole weight and the underside booms.
    # Each row: time in seconds, frequency in Hz, level in dB.
    thuds = [(1.034, 288.7, -16.5), (1.258, 336, -19.5), (1.366, 318, -23), (1.56, 348, -18.5),
             (3.968, 454, -15), (4.055, 412, -17.5), (4.203, 347, -20.5), (6.853, 338, -18.5),
             (7.039, 385.6, -16), (7.698, 290, -21), (7.742, 523, -15)]
    # The hand bumps the start tower as it takes hold. Each row: time in seconds, frequency in Hz, level in dB.
    thumps = [(3.346, 60, -33), (3.364, 108, -29), (3.407, 112, -27.5), (3.456, 135, -31),
              (3.508, 115, -26)]
    pieces = [modes(piece, t60=0.079, damping=0.23, count=420) for piece in (ramp, bowl, chute)]
    trucks = [modes(TRUCK, t60=.042, damping=.1, count=560) for _ in range(2)]
    hollows = [modes(hollow, t60=0.12, damping=0, count=30) for hollow in (underside, floor, deck)]
    toys = rolling(pieces, hollows, trucks) + knocks(pieces, hollows, trucks) + gate() + pings()
    toys = toys + booms(thuds, t60=0.063, rise_s=0.003) + clacks(pieces[-1], trucks[0]) + ticks()
    cut_hz = 135  # such small shells radiate hardly any bass
    toys = signal.sosfilt(signal.butter(2, cut_hz, "high", fs=SR, output="sos"), toys)
    echoes = surroundings(toys, near_db=-13, near_t60=0.11, tail_db=-14.5)
    hand = fingers() + booms(thumps, t60=0.14, rise_s=0.004)
    return town() + opening_hiss() + toys + echoes + hand


def record(dry):
    """Peak limiting: a fast smoothed gain holds peaks down, then a steep low-pass limits the band."""
    ceiling, top_hz = .95, 15200
    need = np.minimum(1, ceiling / (np.abs(dry).max(axis=0) + 1e-9))
    gain = uniform_filter1d(minimum_filter1d(need, size=161), size=81)
    return filtered(dry * gain, lambda hz: hz < top_hz)


dry = scene()
out = record(dry)
store_wav(out)
```